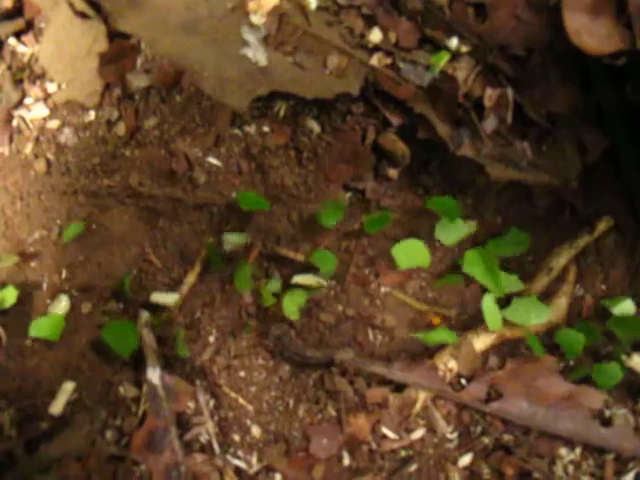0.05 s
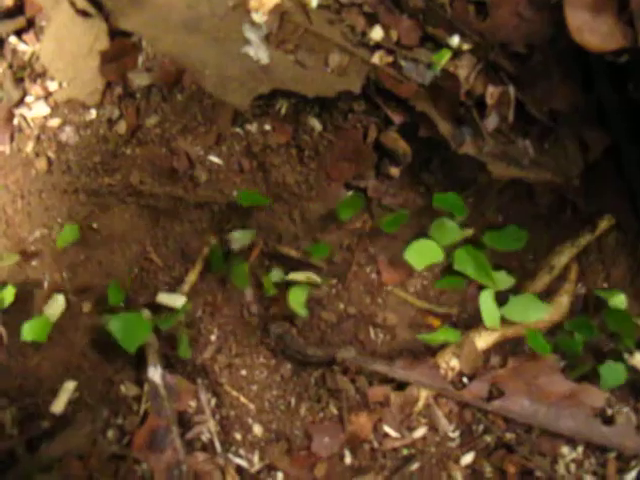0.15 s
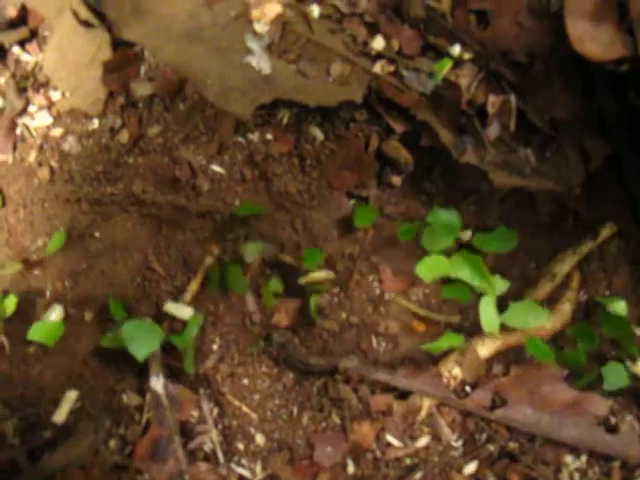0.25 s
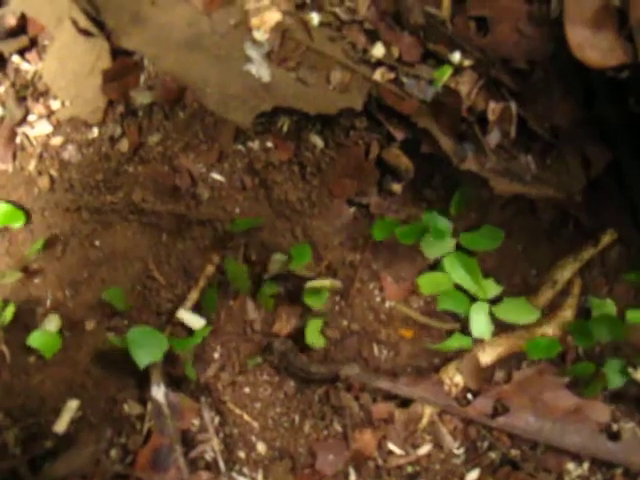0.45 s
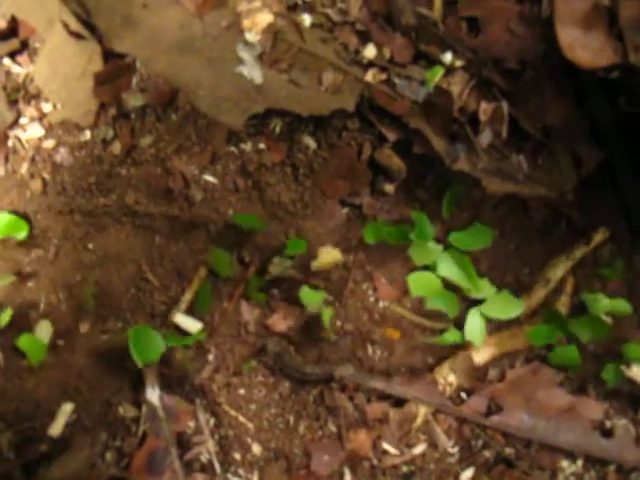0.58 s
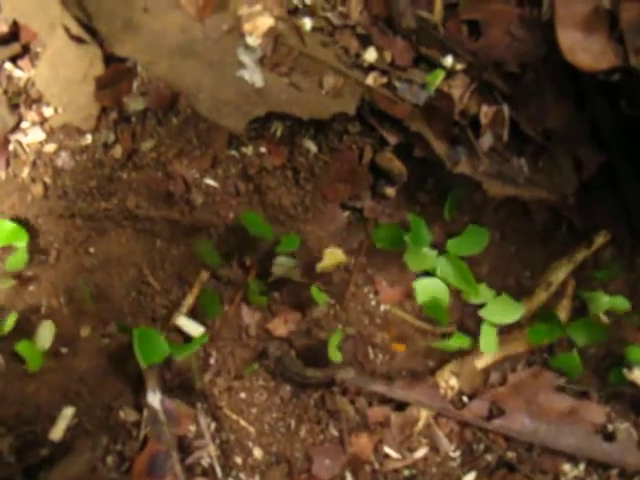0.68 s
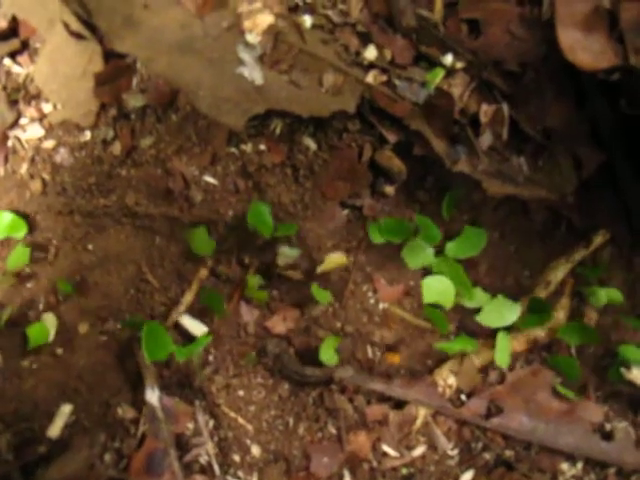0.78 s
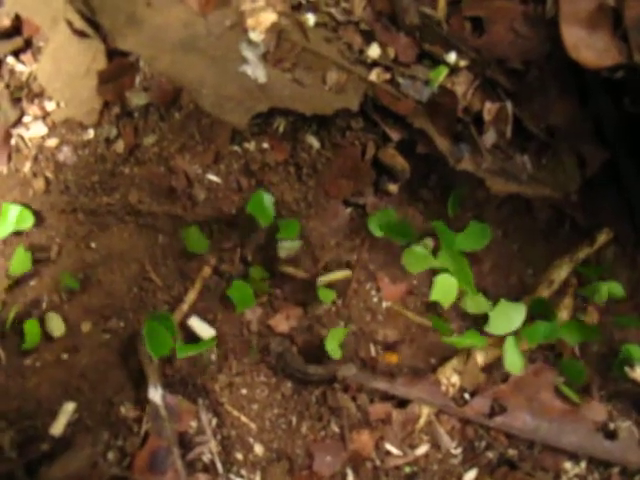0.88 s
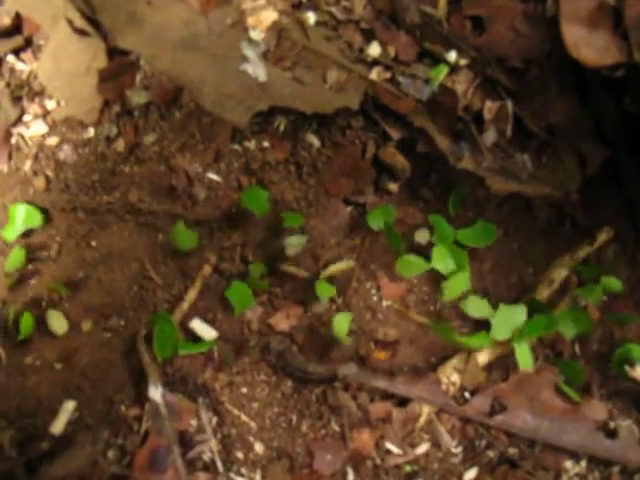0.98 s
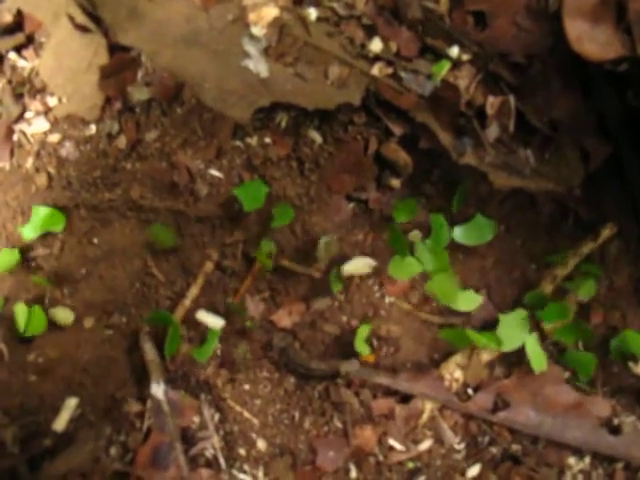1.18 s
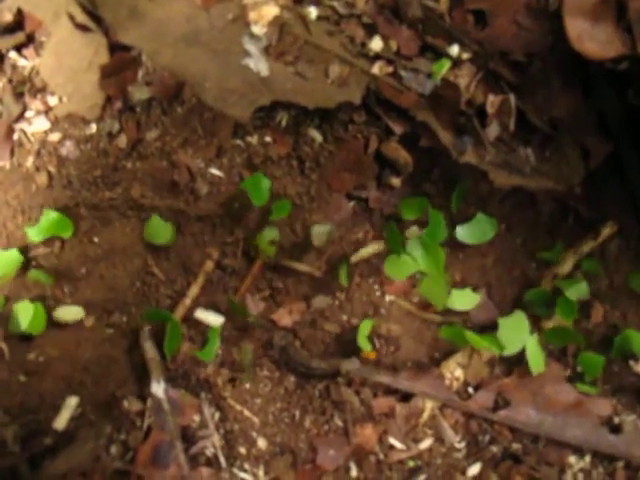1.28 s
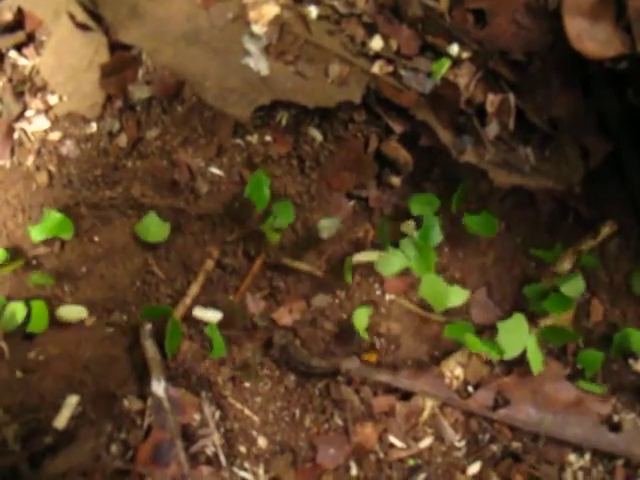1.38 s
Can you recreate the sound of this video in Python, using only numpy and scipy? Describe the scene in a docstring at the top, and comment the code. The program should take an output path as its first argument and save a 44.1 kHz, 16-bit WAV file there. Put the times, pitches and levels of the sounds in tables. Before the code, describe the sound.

A sharp knock and small clicks of camera handling over faint, high jungle insects.

```python
"""Forest floor with insects: one holds a pure high whistle, a second stops early, a chorus shimmers
above them, and a higher pulsed rasp swells now and then. A hand-held camera's case gives one sharp
knock and a few small clicks as the grip shifts; each contact rings its body, shell and catch, and
scatters faintly off ground and trunks. Behind: soft leaf rustles, a far bird, steady air."""
import sys
import numpy as np
from scipy import signal
from scipy.fft import rfft, irfft
from scipy.io import wavfile

SR = 44100
rng = np.random.default_rng(int(sys.argv[2]) if len(sys.argv) > 2 else 0)


def generate_wav(sig):
    """Save sig (samples, or channels by samples) to the path in sys.argv[1] as 16-bit PCM at SR."""
    pcm = np.round(np.clip(np.atleast_2d(sig).T, -1, 1) * 32767).astype(np.int16)
    wavfile.write(sys.argv[1], SR, pcm)


N = 63945
T, HZ = np.arange(N) / SR, np.fft.rfftfreq(N, 1 / SR)

# second whistler's fade (time [s], level [dB])
SECOND_FADE = [(0, -55), (.09, -57.5), (.14, -65), (.2, -68), (.3, -103.5)]
# insect chorus (centre [Hz], width [Hz], level [dB])
CHORUS_BANDS = [(8474, 240, -57), (7393, 273, -63.5)]
# rasp bursts (start [s], time to release [s], level [dB])
RASP_BURSTS = [(-.04, .09, -71), (0.296, .145, -60), (1.315, .13, -57)]
# rasp colour (frequency [Hz], relative level [dB])
RASP_SPECTRUM = [(7000, -25), (9300, -7), (10200, 0), (11300, -2), (12000, -13), (13500, -15), (16000, -25)]
# contacts on the case (time [s], thud [dB], body [dB], shell [dB], catch [dB])
CASE_CONTACTS = [(0.2152, -8.5, -51, -35, -30), (0.2179, -49, -22, -5.5, -17),
                 (0.2383, -85, -84, -76.5, -40.5), (0.3016, -39, -46, -43, -41),
                 (0.3122, -57, -49, -41, -14), (0.3171, -35.5, -37.5, -54, -61.5),
                 (0.3262, -31.5, -39, -42, -32), (0.3555, -39, -46.5, -30, -35),
                 (0.361, -35, -40.5, -34.5, -34), (0.4873, -45.5, -58, -49.5, -73)]
# case body modes (frequency [Hz], level [dB], T60 [s])
BODY_MODES = [(425, -7.5, .036), (868, -8.5, 0.018), (1470, 2, 0.014), (1808, 0, 0.016), (2320, -16, 0.054),
              (2703, -2, 0.025)]
# stiff shell modes (frequency [Hz], level [dB], T60 [s])
SHELL_MODES = [(3250, 1, 0.0081), (3600, 4.5, 0.0034), (4094, 0.5, 0.011)]
# small catch modes (frequency [Hz], level [dB], T60 [s])
CATCH_MODES = [(5280, -5, 0.0039), (6540, 4.5, 0.0026), (9000, -9, 0.002), (10190, -12.5, 0.0051),
               (13000, -47.5, .003)]
# ground and trunk scatter (frequency [Hz], relative level [dB])
ECHO_SPECTRUM = [(200, 0), (800, 0), (2500, -6), (4000, -17), (12000, -20)]
# leaf rustles (peak time [s], half length [s], level [dB])
LEAF_SWELLS = [(.04, 0.024, -58), (.49, 0.0085, -56), (.803, 0.033, -58)]
# rustle colour (frequency [Hz], relative level [dB])
LEAF_SPECTRUM = [(100, -13.5), (700, -9), (3000, 0.5), (7000, -3), (10300, 5.5), (12000, -21.5),
                 (16000, -18.5)]
# bird call (peak time [s], half length [s], pitch [Hz], level [dB])
BIRD_NOTES = [(.948, .016, 3250, -67), (.975, .04, 3690, -69)]
# forest air (frequency [Hz], relative level [dB])
AIR_SPECTRUM = [(25, -42.5), (60, -6), (120, 0), (300, 1), (700, -2.5), (1500, -4.5), (3500, -7),
                (6500, -8), (10300, -8.5), (11800, -25.5), (15500, -20)]


def whistle(pitch_hz, drift_hz=1.5, waver_hz=25, waver_db=0.86, fuzz_db=-15, fuzz_width_hz=260):
    """One insect: a barely wavering tone in a faint band of noise."""
    frequency_hz = pitch_hz + drift_hz * wander(waver_hz)
    tone = np.sqrt(2) * np.sin(2 * np.pi * np.cumsum(frequency_hz) / SR)
    waver = amp(waver_db * wander(waver_hz))
    return tone * waver + amp(fuzz_db) * noise(bell(HZ, pitch_hz, fuzz_width_hz))


def whistlers(first_hz=5882, first_db=-63.5, second_hz=7070):
    """Two insects: one holds, one fades early."""
    second_db = np.interp(T, *np.transpose(SECOND_FADE))
    return amp(first_db) * whistle(first_hz) + amp(second_db) * whistle(second_hz)


def chorus(shimmer_hz=80, shimmer_db=1):
    """Many far insects merge into two shimmering noise bands."""
    return sum(amp(db + shimmer_db * wander(shimmer_hz)) * noise(bell(HZ, hz, width_hz))
               for hz, width_hz, db in CHORUS_BANDS)


def rasp(rise_s=0.068, fall_s=0.059, stroke_hz=29.98, stroke_depth=0.42):
    """Bursts of quick, very high insect strokes that grow, hold and die away."""
    level = np.zeros(N)
    for start_s, release_s, db in RASP_BURSTS:
        t = T - start_s
        envelope = np.clip(t / rise_s, 0, 1) * np.exp(-np.maximum(t - release_s, 0) / fall_s)
        strokes = 1 + stroke_depth * np.cos(2 * np.pi * stroke_hz * t)
        level += amp(db) * envelope * strokes
    return level * noise(colour(RASP_SPECTRUM))


def case_knocks(thud_band_hz=(414, 970), low_cut_hz=198):
    """Each contact shoves the light case and rings body, shell and catch; little bass."""
    thud_filter = signal.butter(3, thud_band_hz, "band", fs=SR, output="sos")
    shove = signal.sosfilt(thud_filter, signal.unit_impulse(N))
    shove /= abs(shove).max()
    knocks = np.zeros(N)
    for start_s, thud_db, body_db, shell_db, catch_db in CASE_CONTACTS:
        t = np.maximum(T - start_s, 0)
        knocks += amp(thud_db) * np.interp(T - start_s, T, shove, left=0)
        knocks += amp(body_db) * ring(BODY_MODES, t)
        knocks += amp(catch_db) * ring(CATCH_MODES, t)
        knocks += amp(shell_db) * (ring(SHELL_MODES, t) + crack(t))
    return signal.lfilter(*signal.butter(2, low_cut_hz, "high", fs=SR), knocks)


def ring(modes, t, rise_s=0.00022, rattle_db=-5.5, rattle_width_ratio=0.33):
    """Struck modes decay, with a loose rattle fading alongside."""
    tone = sum((-1) ** k * amp(db - 60 * t / t60_s) * np.sin(2 * np.pi * hz * t)
               for k, (hz, db, t60_s) in enumerate(modes))
    rattle = noise(sum(amp(db) * bell(HZ, hz, rattle_width_ratio * hz) for hz, db, _ in modes))
    fade = amp(-60 * t / np.mean([t60_s for _, _, t60_s in modes]))
    return (1 - np.exp(-t / rise_s)) * (tone + amp(rattle_db) * fade * rattle)


def crack(t, centre_hz=8300, width_hz=2500, peak_s=0.00089, gain_db=-16.5):
    """Crisp edge of a clack on the shell."""
    envelope = t / peak_s * np.exp(-t / peak_s)
    return amp(gain_db) * envelope * noise(bell(HZ, centre_hz, width_hz))


def echoes(source, gain_db=-41, t60_s=0.14, rise_s=0.01):
    """Faint, dull scatter off ground and trunks."""
    tail = noise(colour(ECHO_SPECTRUM)) * amp(-60 * T / t60_s) * (1 - np.exp(-T / rise_s))
    return amp(gain_db) * signal.fftconvolve(source, tail / np.linalg.norm(tail))[:N]


def leaves():
    """Leaves rustle in brief, soft swells."""
    return sum(swell(*row) for row in LEAF_SWELLS) * noise(colour(LEAF_SPECTRUM))


def bird(blur_hz=130):
    """Two notes stepping upward, blurred by distance."""
    return sum(swell(peak_s, half_s, db) * noise(bell(HZ, hz, blur_hz))
               for peak_s, half_s, hz, db in BIRD_NOTES)


def air(level_db=-62.5):
    """Steady hush of forest air."""
    return amp(level_db) * noise(colour(AIR_SPECTRUM))


def amp(db):
    """Decibels to gain."""
    return 10 ** (np.asarray(db) / 20)


def noise(gain):
    """Unit-rms noise with the given gain per frequency."""
    x = irfft(rfft(rng.standard_normal(N)) * gain, N)
    return x / (x.std() + 1e-20)


def wander(bandwidth_hz):
    """Unit-rms low-pass fluctuation."""
    return noise(bell(HZ, 0, bandwidth_hz))


def colour(points):
    """Gain per frequency from (frequency [Hz], level [dB]) points."""
    hz, db = np.transpose(points)
    return amp(np.interp(np.log(HZ + 1), np.log(hz), db))


def bell(x, centre, width):
    """Gaussian of height 1."""
    return np.exp(-0.5 * ((x - centre) / width) ** 2)


def swell(peak_s, half_s, db):
    """Soft envelope with long skirts."""
    return amp(db) / np.cosh(np.clip((T - peak_s) / half_s, -50, 50))


def scene():
    """All sources summed, alike in both channels."""
    knocks = case_knocks()
    insects = whistlers() + chorus() + rasp()
    background = bird() + air() + leaves()
    mono = insects + knocks + echoes(knocks) + background
    return np.array([mono, mono])


def record(dry, start_s=0.022, fade_in_s=0.0011, cutoff_hz=16000):
    """Brief silence, fast fade-in, low-pass."""
    opened = dry * np.clip((T - start_s) / fade_in_s, 0, 1)
    low_pass = signal.firwin(511, cutoff_hz, window=("kaiser", 9), fs=SR)
    return signal.oaconvolve(opened, low_pass[None], "same")


dry = scene()
out = record(dry)
generate_wav(out)
```